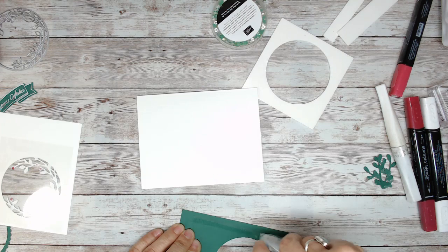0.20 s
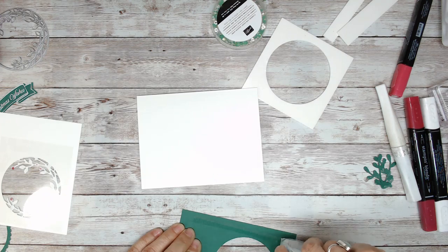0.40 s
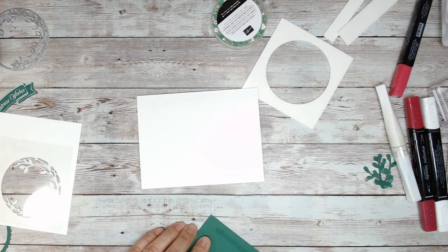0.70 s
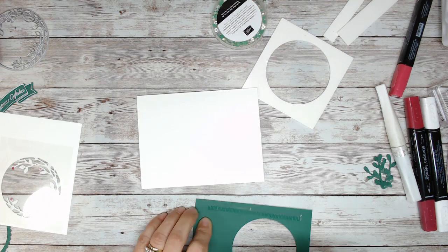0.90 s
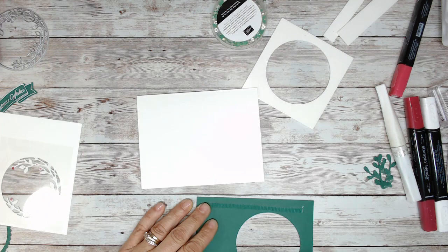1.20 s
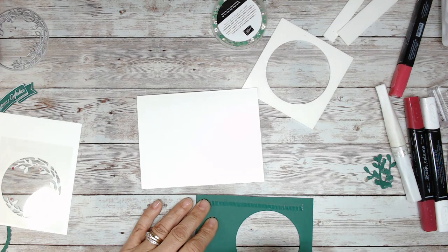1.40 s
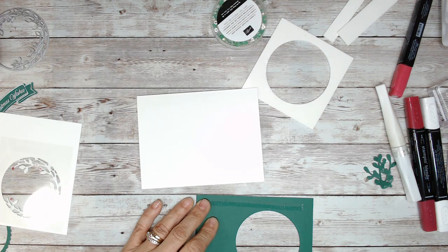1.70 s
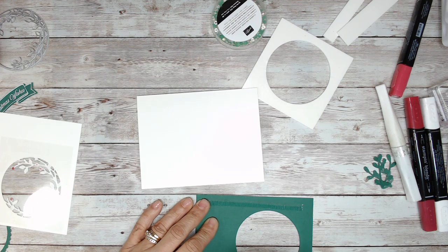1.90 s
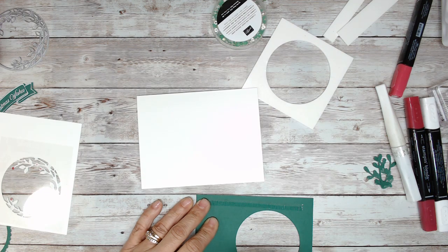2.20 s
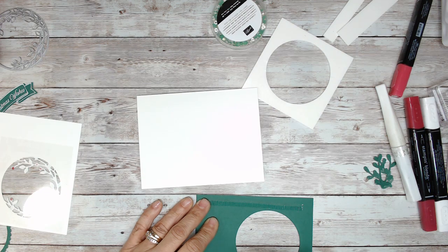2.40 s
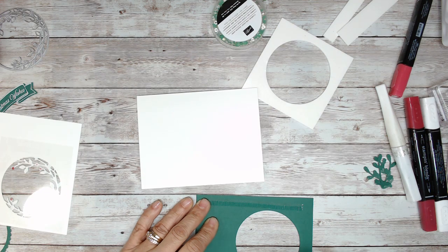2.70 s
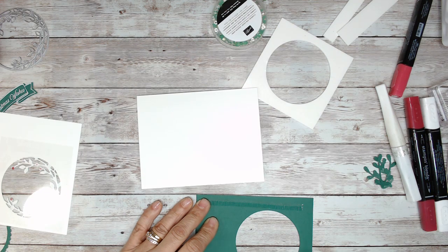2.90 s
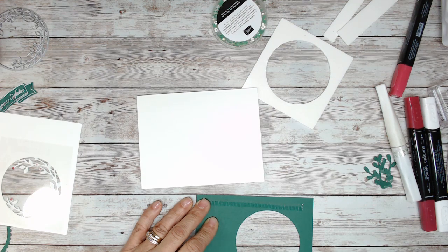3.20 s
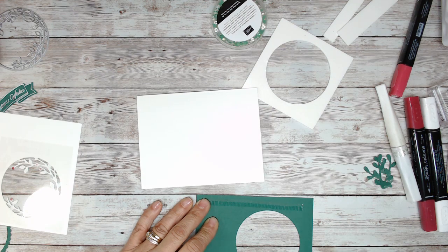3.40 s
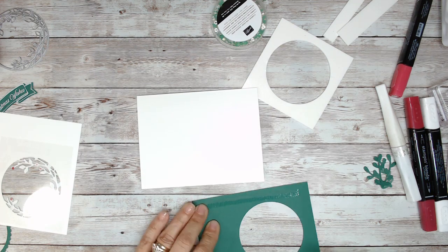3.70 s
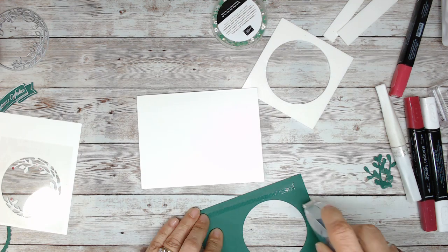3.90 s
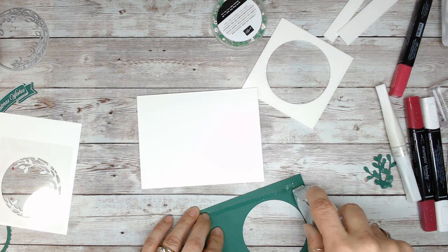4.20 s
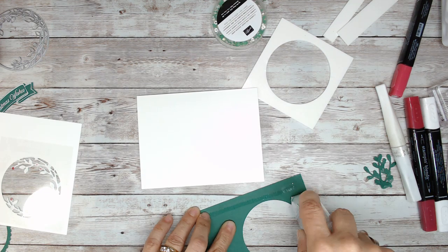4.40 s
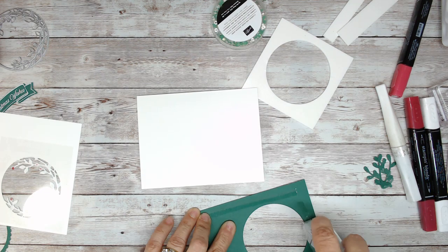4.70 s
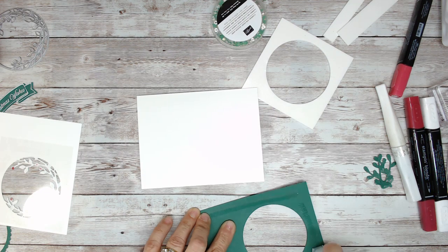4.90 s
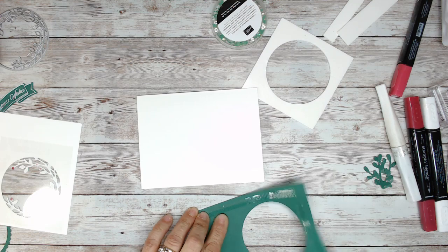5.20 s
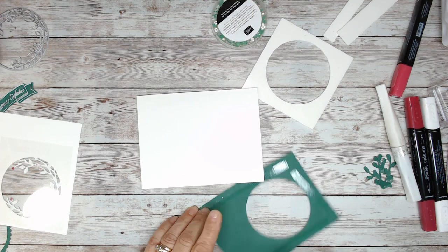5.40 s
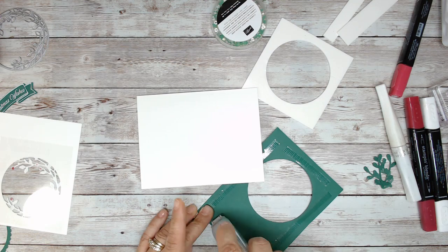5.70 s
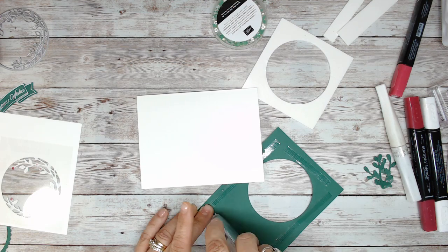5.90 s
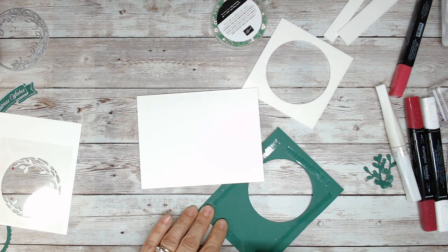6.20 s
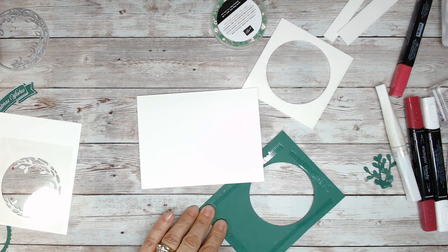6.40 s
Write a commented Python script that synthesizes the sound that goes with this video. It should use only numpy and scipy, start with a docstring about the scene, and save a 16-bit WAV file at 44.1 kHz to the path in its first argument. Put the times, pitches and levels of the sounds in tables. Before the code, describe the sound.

Close, dry craft-table sounds in a small room with short echoes, low rumble and faint steady air. From 0 to 0.6 s a tape runner scrapes along stiff card with a hissing rasp and bright sticky ticks. Around 0.6-0.9 s a tick, a knock and a strong card swish. At 1.4 s a double soft thump on the wood with light clicks and brushing; another thump at 2.0 s. From 2.25 to 3.0 s a dense run of crisp ticks over a thin rasp, then brisk little card skids at 3.2-3.3 s and a soft brush at 3.55 s. A light thump at 4.13 s, taps and scrape at 4.4-4.5 s, then faint dragging. At 5.24 s the loudest sharp snap and card slap, then a swish; a click, knock and thump at 5.82 s; papery sliding around 6.1 s; a bright double snap with a card flick at 6.35 s, fading into rustle.

```python
"""Sharp ticks of sticky film and the scrape of stiff card, heard close, as a plastic tape runner is dragged
over card on a wooden craft table. Among these the case knocks on the table and hands thump it.
Ticks are short ringing flicks, scrapes and knocks are coloured noise, thumps ring the table's modes.
A close microphone, in a small room with short echoes, low rumble and steady air."""
import sys
import numpy as np
from scipy import signal
from scipy.fft import rfft, irfft
from scipy.io import wavfile
from scipy.ndimage import uniform_filter1d

SR = 44100
rng = np.random.default_rng(int(sys.argv[2]) if len(sys.argv) > 2 else 0)


def level_to_linear(level):
    """Convert decibel levels to linear amplitude factors, elementwise."""
    exponent = np.asarray(level, float) / 20
    return 10 ** exponent


def unload_wav(signal):
    """Save mono or channel-first audio to the path in sys.argv[1] as 16-bit WAV at rate SR, clipped to [-1, 1]."""
    wavfile.write(
        sys.argv[1],
        SR,
        np.round(np.clip(np.atleast_2d(signal).T, -1, 1) * 32767).astype(np.int16),
    )


N = 286870  # samples
DELAY = round(0.25 / 343 * SR)  # short shared delay, in samples, of ticks and knocks


def evened(x):
    """Scales to rms 1."""
    return x / np.sqrt(np.mean(x ** 2) + 1e-20)


def read(points, hz):
    """Reads a curve on a log frequency axis, holding its end values outside."""
    f, value = np.transpose(points)
    return np.interp(np.log(hz + 1), np.log(f + 1), value)


def colour(points, size=2048):
    """Minimum-phase filter taps of energy 1 for a spectrum, falling to -70 dB an octave outside it."""
    below, above = (points[0][0] / 2, -70), (points[-1][0] * 2, -70)
    closed = [below] + list(points) + [above]
    log_gain = np.log(level_to_linear(read(closed, abs(np.fft.fftfreq(size, 1 / SR)))))
    spectrum = np.exp(np.conj(signal.hilbert(log_gain)))
    taps = np.fft.ifft(spectrum).real[:size // 2]
    return taps / np.linalg.norm(taps)


def through(x, taps):
    """Convolution cut to the length of the scene."""
    return signal.oaconvolve(x, taps)[:N]


def drift(size):
    """Slow random wander of rms 1, smoothed twice over size samples."""
    return evened(uniform_filter1d(uniform_filter1d(rng.standard_normal(N), size), size))


# Table and room rumble, level over time: time_s, level_db
RUMBLE_LEVEL = [(0.0, -43.5), (0.18, -38.5), (0.6, -46), (0.85, -41), (1.94, -44.5), (2.1, -42),
                (4.07, -43.5), (4.31, -42), (5.05, -41), (5.29, -37.5), (5.83, -43), (5.97, -37.5),
                (6.5, -42)]
# Spectrum of the rumble: frequency_hz, relative_density_db (per Hz)
RUMBLE_COLOUR = [(26, -51), (45, -2), (59, -35), (74, -2.5), (97, 1), (151, -2), (178, -8), (231, -3),
                 (301, -31), (330, -18.5), (430, -31), (730, -120)]
# Spectrum of the room air: frequency_hz, relative_density_db (per Hz)
AIR_COLOUR = [(160, -47), (280, -0.5), (533, -23), (610, -1.5), (1060, -16.5), (1350, -20), (1560, -12.5),
              (2340, -18), (3620, -28.5), (5100, -19), (10000, -26.5), (13000, -64), (22000, -120)]
AIR_DB = -57


def floor():
    """Low rumble, noise with a moving level, over the steady air of the room."""
    hz = np.fft.rfftfreq(N, 1 / SR)

    def shaped_noise(spectrum):
        """White noise given a spectrum in the frequency domain."""
        return evened(irfft(rfft(rng.standard_normal(N)) * level_to_linear(read(spectrum, hz)), N))

    rumble, air = shaped_noise(RUMBLE_COLOUR), shaped_noise(AIR_COLOUR)
    rumble_db = np.interp(np.arange(N) / SR, *np.transpose(RUMBLE_LEVEL))
    rumble = rumble * level_to_linear(rumble_db + 0.89 * drift(size=2500))
    return rumble + air * level_to_linear(AIR_DB + 0.42 * drift(size=6000))


def slopes(t, start, end, up, down):
    """Level in dB below the top: climbs to start, holds, sinks after end; slopes in dB/s."""
    return np.minimum(0, np.minimum((t - start) * up, (end - t) * down))


# Steady drags over the card: start_s, length_s, hiss_db, card_over_hiss_db, film_rasp_db
DRAGS = [(0.0, 0.31, -45, -3, -55), (0.626, 0.079, -47, -5, -59), (2.285, 0.11, -51.5, -8.5, -51),
         (2.45, 0.32, -47.5, -5, -64), (2.883, 0.2, -60, 1, -53.5), (3.09, 0.092, -56.5, -1, -71),
         (3.697, 0.1, -56.5, -13, -66), (4.65, 0.055, -55.5, 0, -67), (4.786, 0.087, -53, 0.5, -69),
         (4.916, .28, -64, 1, -70), (5.89, 0.27, -57.5, 7, -70), (6.046, 0.089, -57.5, 11.5, -47.5)]
GRAB_DB_PER_S, LIFT_DB_PER_S = 400, 92  # a drag starts quickly and trails off
# The card skids, slaps or is brushed once:
# peak_s, rise_s, fall_s (times for a change of SWING_DB), hiss_db, card_over_hiss_db
SKIDS = [(0.704, .06, 0.068, -31, -17), (0.892, 0.15, 0.18, -38.5, -11), (1.261, 0.078, 0.069, -57, -18),
         (1.391, 0.026, 0.086, -49.5, 1.5), (1.522, 0.077, .2, -47.5, 0.5), (2.025, 0.056, 0.31, -57.5, 1),
         (3.205, 0.024, 0.082, -40.5, -14), (3.296, 0.019, 0.092, -39.5, -10),
         (3.565, 0.13, 0.11, -47.5, -7), (4.143, 0.057, 0.31, -58.5, 6.5), (4.425, 0.031, 0.35, -45.5, 1),
         (4.474, .012, 0.097, -38, -3.5), (5.081, 0.059, .2, -55, 2), (5.235, 0.014, 0.13, -23, -1.5),
         (5.29, 0.057, 0.099, -35.5, -12), (5.465, 0.28, 0.2, -46.5, -4), (5.824, 0.0073, 0.073, -36, 5.5),
         (6.094, 0.08, 0.19, -37, -4.5), (6.165, 0.065, 0.076, -35, 4), (6.363, 0.026, 0.038, -25.5, -2),
         (6.39, 0.071, 0.18, -37.5, -3)]
SWING_DB = 20
CARD_FLOOR_DB = -65.5  # steady faint card noise under all strokes


def pressure():
    """Drags and skids add as powers: hiss and card levels in dB, and the gain of the film rasp."""
    t = np.arange(0, N + 64, 64) / SR
    strokes, peeling = [], 0
    for start, length, hiss_db, card_over_db, rasp_db in DRAGS:
        shape = slopes(t, start, start + length, GRAB_DB_PER_S, LIFT_DB_PER_S)
        strokes.append((hiss_db + shape, card_over_db))
        peeling = peeling + level_to_linear(shape + rasp_db)
    for peak, rise, fall, hiss_db, card_over_db in SKIDS:
        # no rise is shorter than 3 ms and no fall than 10 ms
        shape = slopes(t, peak, peak, SWING_DB / max(rise, 0.003), SWING_DB / max(fall, 0.01))
        strokes.append((hiss_db + shape, card_over_db))
    hiss = sum(level_to_linear(2 * db) for db, _ in strokes) + level_to_linear(-170)
    card = sum(level_to_linear(2 * (db + over)) for db, over in strokes) + level_to_linear(2 * CARD_FLOOR_DB)
    curves = (10 * np.log10(hiss), 10 * np.log10(card), peeling)
    return [np.interp(np.arange(N) / SR, t, curve) for curve in curves]


# Spectra of the fibre hiss, the card body and the wooden table top: frequency_hz, relative_gain_db
HISS_COLOUR = [(3000, -7), (3600, -9), (4600, 5), (6000, 6.5), (7500, 2.5), (9800, 4.5)]
CARD_COLOUR = [(1250, -29), (1500, -5.5), (1850, 1), (2350, 2), (2900, -4), (3400, -20), (4000, -13.5)]
WOOD_COLOUR = [(260, -15.5), (380, -4.5), (560, 0), (800, -5), (1050, -4), (1300, -11.5), (1600, -75)]


def scrape(levels_db):
    """Fibres catch and slip: dense uneven grains through the hiss, card and table colours."""
    grip_db = 1.3 * drift(size=120)  # the grip flutters
    out = np.zeros(N)
    colours = (HISS_COLOUR, CARD_COLOUR, WOOD_COLOUR)
    for points, db, grain_db in zip(colours, levels_db, (3.5, 2.5, 1.2)):
        unevenness_db = grain_db * np.minimum(rng.exponential(1, N), 6)
        grains = evened(rng.standard_normal(N) * level_to_linear(unevenness_db))
        out += through(grains * level_to_linear(db + grip_db), colour(points))
    return out


RASP_PER_S, RASP_HZ, RASP_T60_S = 230, 6290, 0.012  # tiny film snaps all along a drag
RASP_SPREAD = 0.043  # largest share by which the pitch of a snap strays


def rasp(peeling):
    """Uneven little snaps of film in clumps, each ringing briefly near one pitch."""
    snap_db = 2.0 * np.minimum(rng.exponential(1, N), 4) + 2.1 * drift(size=500)
    snaps = (rng.random(N) < RASP_PER_S / SR) * level_to_linear(snap_db)
    patch = rng.integers(-2, 3, N)  # one of five pitches for each snap
    t = np.arange(400) / SR
    out = np.zeros(N)
    for k in range(-2, 3):
        hz = RASP_HZ * (1 + RASP_SPREAD * k / 2)
        ringing = np.sin(2 * np.pi * hz * t) * level_to_linear(-60 * t / RASP_T60_S)
        out += through(snaps * (patch == k), ringing)
    return peeling * evened(out)


# the table top follows a firm scrape in full, a light one by only a share of its dB
WOOD_UNDER_DB, WOOD_LIGHT_DB, WOOD_LIGHT_SHARE, LIGHT_DB = -7.5, -56, 0.33, -59


def rub():
    """Drags and skids make one scraping; the table follows the card."""
    hiss_db, card_db, peeling = pressure()
    light_db = WOOD_LIGHT_DB + WOOD_LIGHT_SHARE * (card_db - LIGHT_DB)
    firm_db = card_db + WOOD_UNDER_DB
    wood_db = 10 * np.log10(level_to_linear(2 * light_db) + level_to_linear(2 * firm_db))
    return scrape([hiss_db, card_db, wood_db]) + rasp(peeling)


def cracks(events, crowd, t60):
    """One sharp crack for each event, with smaller dying ones behind it."""
    decay = level_to_linear(-60 * np.arange(600) / SR / t60)
    crack = crowd * rng.standard_normal((len(events), 600)) * decay
    crack[:, 0] = np.sign(crack[:, 0])
    return crack


# Sticky film lets go at the card: start_s, level_db (peak, before the shared gain and bass cut), pitch_hz
TICKS = [(0.0104, -24, 5950), (0.0214, -24, 6510), (0.0333, -21, 7680), (0.0484, -21, 6270),
         (0.1825, -20, 5960), (0.2134, -14, 6290), (0.2603, -24, 6290), (0.2877, -23, 6200),
         (0.3611, -20, 6490), (0.3734, -27, 6030), (0.4604, -30, 6520), (0.5671, -24, 6260),
         (0.6105, -18, 9450), (1.3798, -31, 5100), (1.502, -26, 4920), (1.5519, -34, 6210),
         (1.5718, -34, 6230), (2.2548, -33, 9280), (2.2777, -20, 6580), (2.3106, -26, 5980),
         (2.3356, -23, 6100), (2.3735, -20, 5190), (2.4329, -31, 6380), (2.4504, -26, 5260),
         (2.5202, -26, 6140), (2.5591, -21, 6630), (2.602, -29, 5630), (2.6614, -17, 4710),
         (2.6843, -22, 9390), (2.7142, -22, 6660), (2.7447, -20, 4870), (2.7701, -20, 6020),
         (2.9721, -23, 5940), (3.0036, -29, 5930), (3.1198, -26, 6650), (3.1971, -25, 5290),
         (3.2061, -26, 6400), (3.2914, -20, 5240), (3.486, -37, 7500), (3.5733, -28, 5350),
         (3.711, -35, 5900), (3.8726, -36, 5720), (4.3989, -28, 6260), (4.4348, -23, 6750),
         (4.4722, -22, 5360), (4.681, -33, 8200), (5.081, -34, 6500), (5.1357, -32, 7820),
         (5.2305, -15, 9140), (5.2365, -11, 5090), (5.8177, -26, 5680), (5.8237, -18, 6440),
         (5.9963, -27, 8410), (6.0427, -25, 7320), (6.0766, -24, 5810), (6.321, -28, 8290),
         (6.3445, -16, 4760), (6.3579, -12, 6720)]


def ticks():
    """A patch of film flicks for a cycle or two at each crack."""
    t, out = np.arange(60) / SR, np.zeros(N + 800)
    for (s, db, hz), crack in zip(TICKS, cracks(TICKS, crowd=0.13, t60=0.012)):
        cycle = np.cos(2 * np.pi * hz * t) * level_to_linear(-60 * t / 0.0008)
        flick = np.convolve(crack, cycle)
        out[int(s * SR) + DELAY:][:len(flick)] += level_to_linear(db) * flick / abs(flick).max()
    bass_cut = signal.butter(2, 1500, "high", fs=SR, output="sos")
    return level_to_linear(3.5) * signal.sosfilt(bass_cut, out[:N])


# How long the small room rings: frequency_hz, t60_s
ROOM_DECAY = [(300, 1), (1000, 0.42), (2500, 0.18), (5000, 0.16), (9000, 0.091)]


def room(x):
    """Three tails of sparse taps take turns, each band dying at its own speed."""
    out, at = np.zeros(N), np.arange(60, SR - 20, 20)
    turn = np.arange(N) / SR * 9  # 9 rad/s
    for k in range(3):
        taps = np.zeros(SR)
        taps[at + rng.integers(0, 20, len(at))] = rng.choice([-1., 1.], len(at))
        hz, t, bands = signal.stft(taps, SR, nperseg=256)
        t60 = np.maximum(read(ROOM_DECAY, hz), 0.05)[:, None]
        tail = signal.istft(bands * level_to_linear(-60 * t / t60), SR, nperseg=256)[1]
        share = np.sqrt(2 / 3) * np.cos(turn + k * np.pi / 3)  # the three powers add to 1
        out += through(x * share, tail / np.linalg.norm(tail))
    return out


# The case knocks on the table: start_s, case_level_db, wood_over_case_db
# (both levels drive the cracks, before the card and wood filters and their gains)
KNOCKS = [(0.7064, -19, -14.5), (1.3809, -30, -11), (1.504, -23.5, -11), (2.0073, -37, -19),
          (2.714, -30, -9.5), (2.7447, -30, -20), (2.7696, -28, -17), (3.1963, -33, -32),
          (3.2914, -39.5, -9), (3.5433, -33.5, -9), (3.574, -48, -16), (4.127, -27.5, -15),
          (4.4152, -20, -26), (4.4722, -23.5, -33), (4.6509, -33, -22), (5.2364, -6.5, -15),
          (5.8243, -15, -12), (5.8458, -27.5, 1.5), (6.111, -24.5, -7.5), (6.343, -39, -1),
          (6.3579, -26, 0.5)]


def knocks():
    """The case meets the card with a dry tap and the wood answers lower."""
    case, wood = np.zeros((2, N + 700))
    for (s, db, wood_db), crack in zip(KNOCKS, cracks(KNOCKS, crowd=0.24, t60=0.0097)):
        start = int(s * SR) + DELAY
        case[start:][:600] += level_to_linear(db) * crack
        wood[start:][:600] += level_to_linear(db + wood_db) * crack
    tap = level_to_linear(8.5) * through(case, colour(CARD_COLOUR))
    answer = level_to_linear(15.5) * through(wood, colour(WOOD_COLOUR))
    return tap + answer


def ring(modes, size):
    """Decaying modes after one blow, peak 1."""
    t = np.arange(size) / SR
    y = sum(level_to_linear(db - 60 * t / t60) * np.sin(2 * np.pi * hz * t) for hz, db, t60 in modes)
    return y / abs(y).max()


# Hands and tool landing on the table: start_s, level_db (of the blow that drives the table)
THUMPS = [(1.385, -18.5), (1.397, -15), (2.011, -27), (2.021, -21.5), (2.585, -49), (4.131, -31.5),
          (5.237, -27), (5.823, -21.5), (5.849, -44)]
# Ringing modes of the table top: pitch_hz, relative_level_db, t60_s
TABLE_MODES = [(99.4, 0.5, 0.13), (142.7, -2, 0.15), (202.5, -1, 0.25), (255, -4, 0.14), (350, -6, 0.08),
               (447, -5, 0.06), (570, -9, 0.035)]


def thumps():
    """A blow, smoothed to a push of about a millisecond, sets the table top ringing."""
    blows = np.zeros(N + 900)
    decay = level_to_linear(-60 * np.arange(900) / SR / 0.04)
    noises = rng.standard_normal((len(THUMPS), 900)) * decay
    for (s, db), noise in zip(THUMPS, noises):
        blow = 0.035 * noise  # a faint dying noise follows each blow
        blow[0] += 1
        blows[int(s * SR):][:900] += level_to_linear(db) * blow
    push = np.hanning(50)
    return through(through(blows, push / push.sum()), ring(TABLE_MODES, size=20000))


def scene():
    """Close sounds, the echo of ticks, knocks and rubbing in the room, thumps and the floor."""
    snaps, blows, rubbing = ticks(), knocks(), rub()
    wet = room(level_to_linear(-6.0) * snaps) + room(level_to_linear(-5.0) * blows + level_to_linear(-13) * rubbing)
    return (snaps + blows + rubbing + wet + thumps() + floor())[None]


def roll_off(x):
    """The treble ends steeply here."""
    return signal.sosfilt(signal.butter(12, 12630, fs=SR, output="sos"), x)


def record(dry):
    """Drops the deepest bass and limits the band steeply; a faint separate strip of treble remains."""
    bass_cut = signal.butter(4, 68, "high", fs=SR, output="sos")
    dry = signal.sosfilt(bass_cut, dry)
    window = ("kaiser", 9)
    below_edge = signal.firwin(511, 10250, window=window, fs=SR)
    strip = signal.firwin(511, [11600, 12450], pass_zero=False, window=window, fs=SR)
    low = signal.oaconvolve(dry, below_edge[None], "same")
    top = signal.oaconvolve(dry, strip[None], "same")
    return roll_off(low + level_to_linear(-9.0) * top)


dry = scene()
out = record(dry)
unload_wav(out)
```